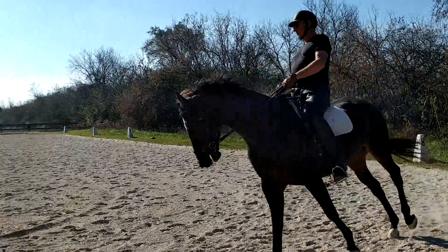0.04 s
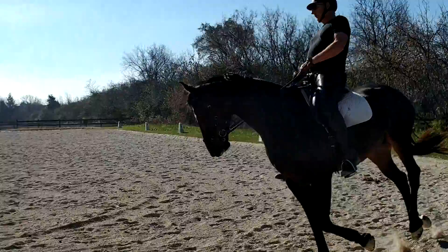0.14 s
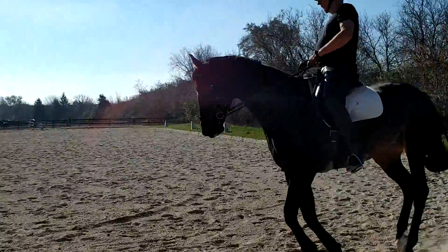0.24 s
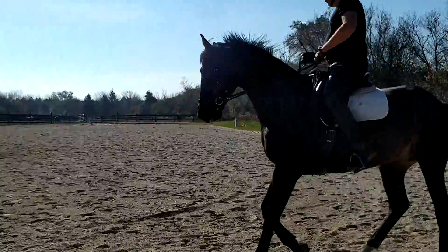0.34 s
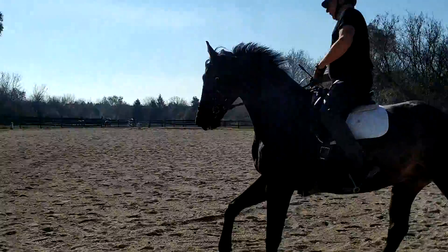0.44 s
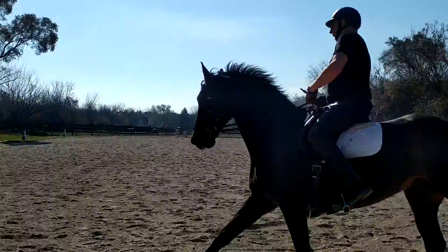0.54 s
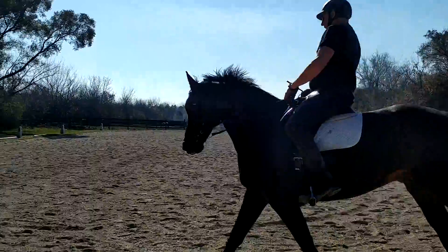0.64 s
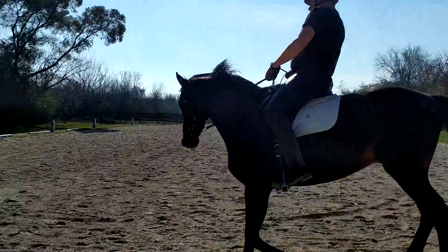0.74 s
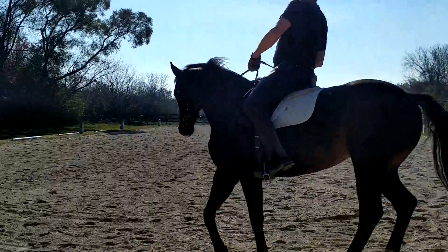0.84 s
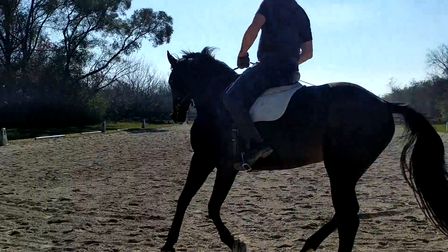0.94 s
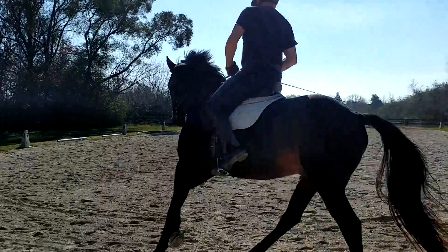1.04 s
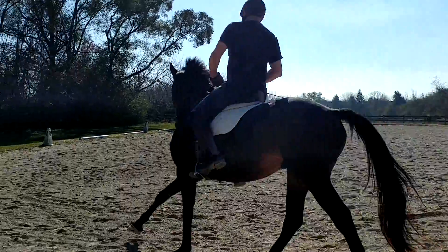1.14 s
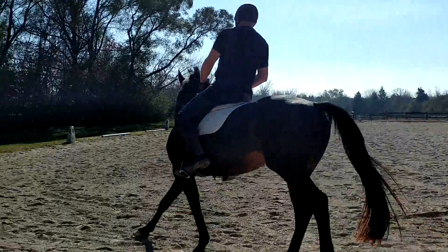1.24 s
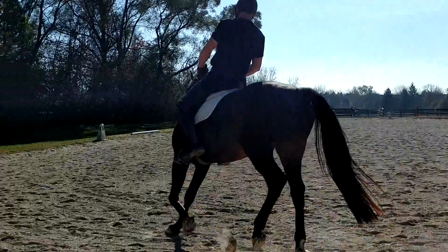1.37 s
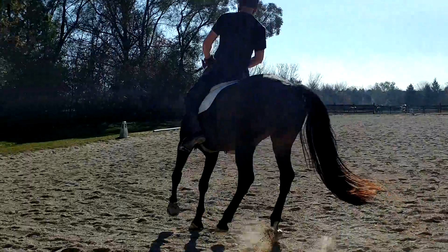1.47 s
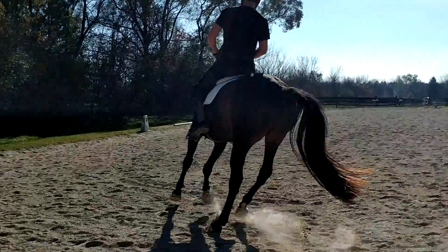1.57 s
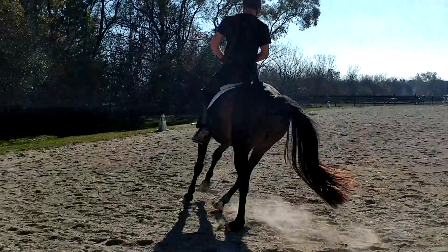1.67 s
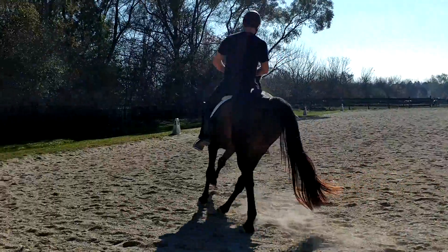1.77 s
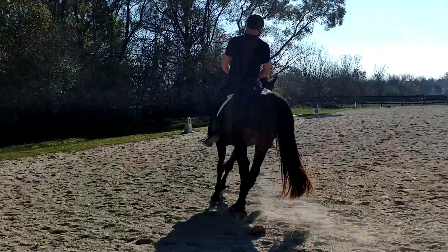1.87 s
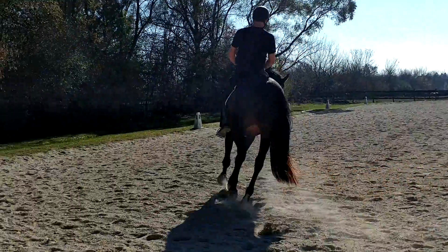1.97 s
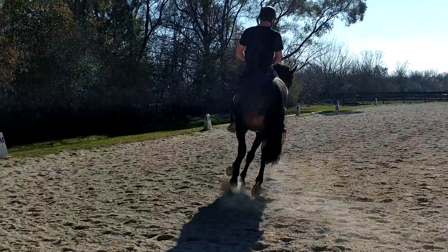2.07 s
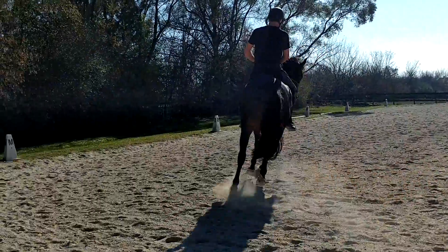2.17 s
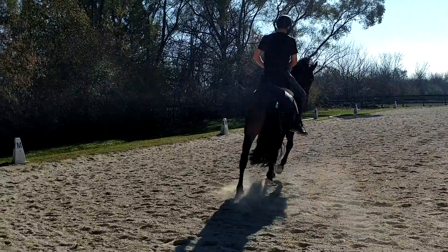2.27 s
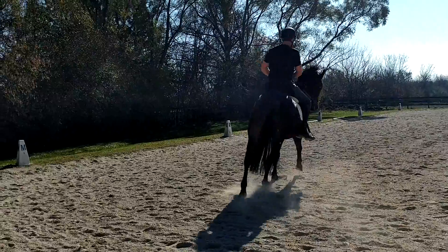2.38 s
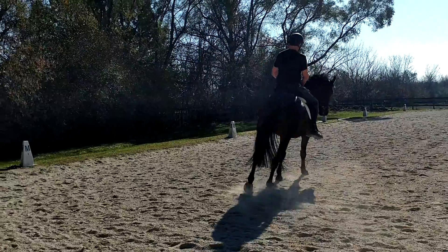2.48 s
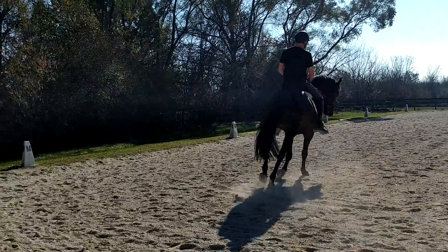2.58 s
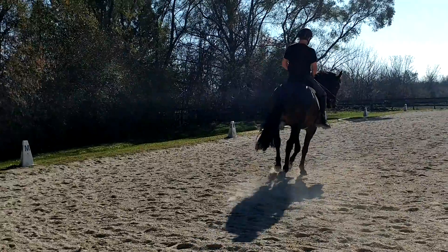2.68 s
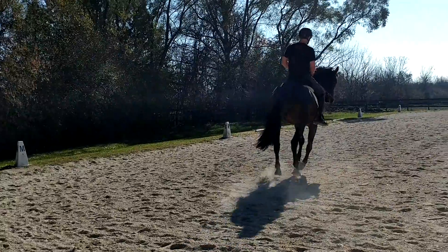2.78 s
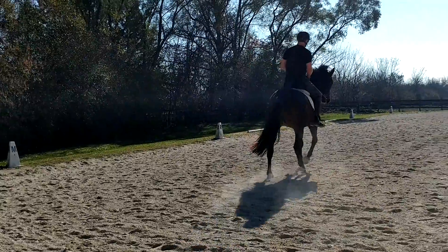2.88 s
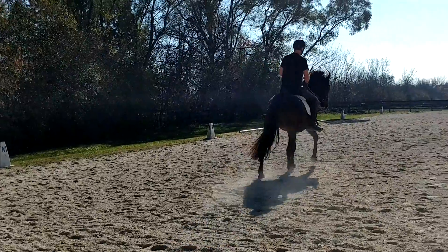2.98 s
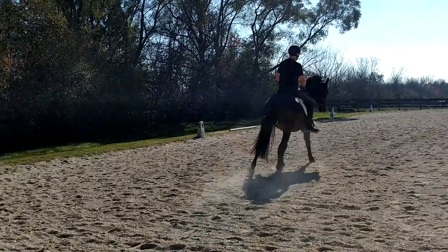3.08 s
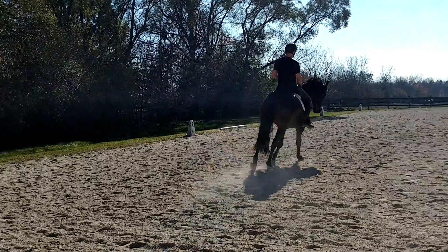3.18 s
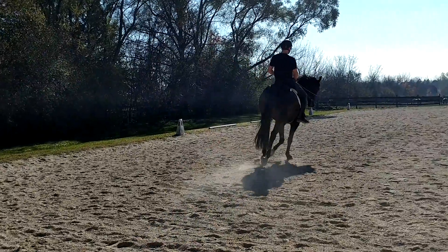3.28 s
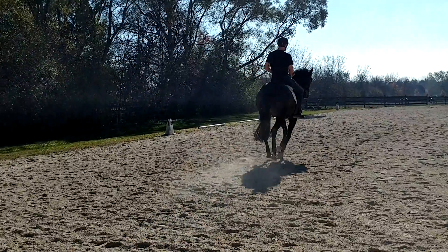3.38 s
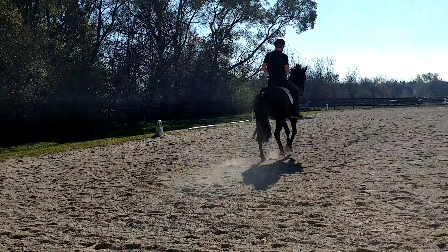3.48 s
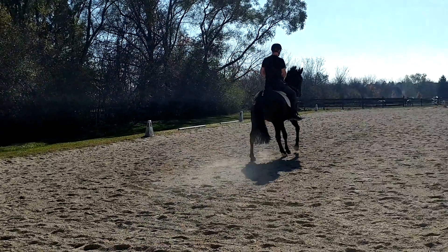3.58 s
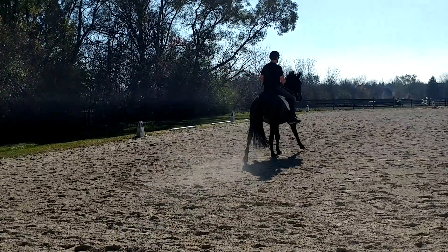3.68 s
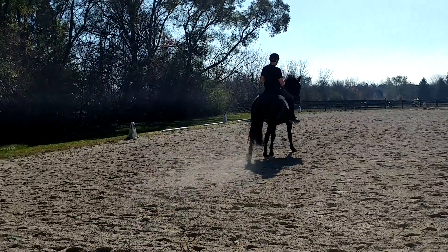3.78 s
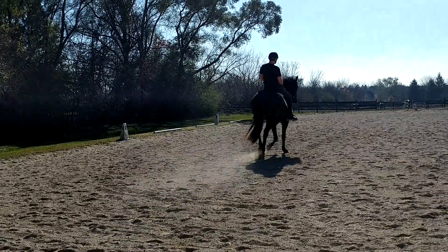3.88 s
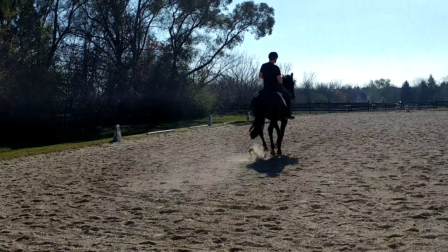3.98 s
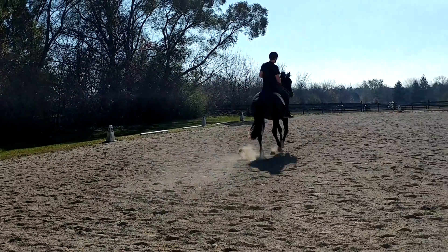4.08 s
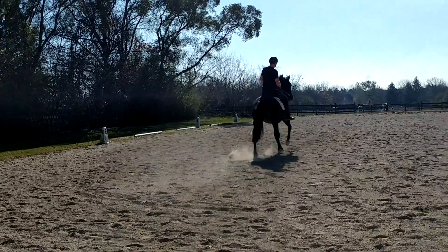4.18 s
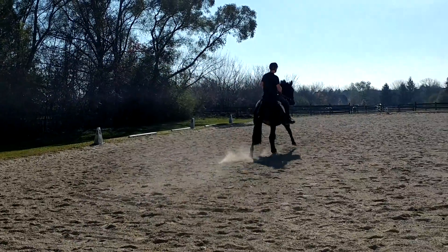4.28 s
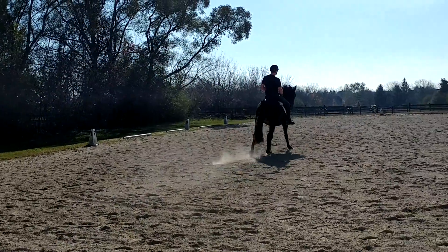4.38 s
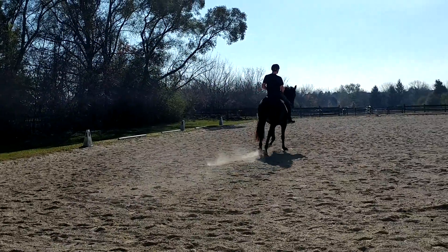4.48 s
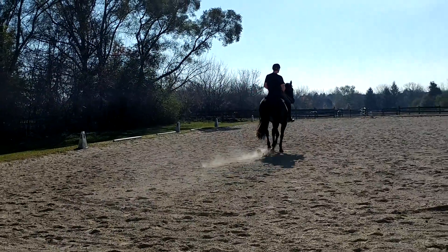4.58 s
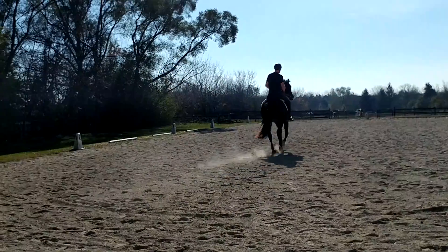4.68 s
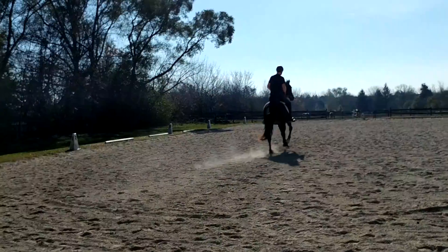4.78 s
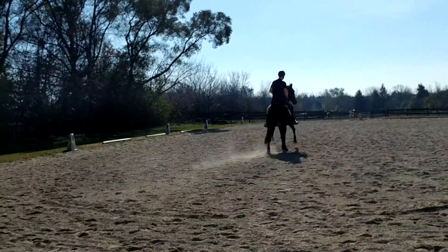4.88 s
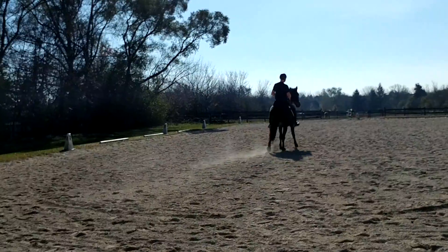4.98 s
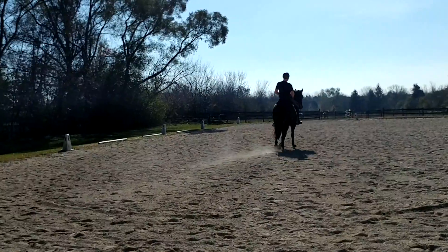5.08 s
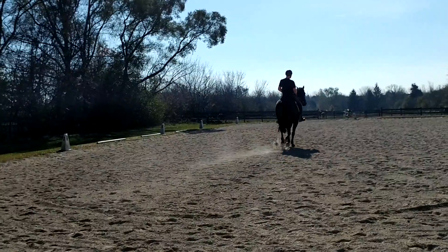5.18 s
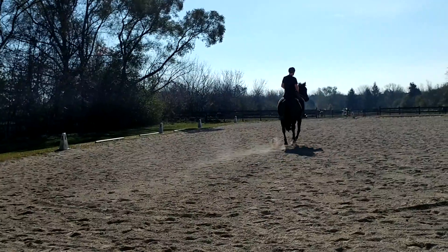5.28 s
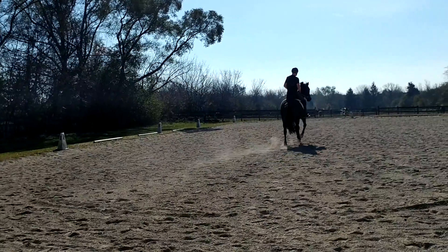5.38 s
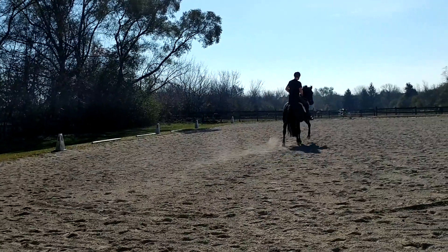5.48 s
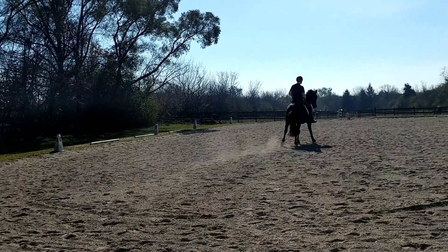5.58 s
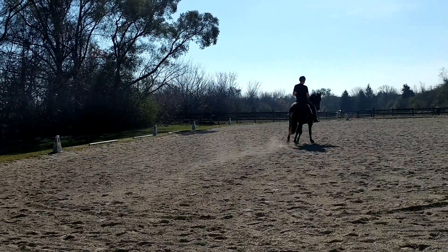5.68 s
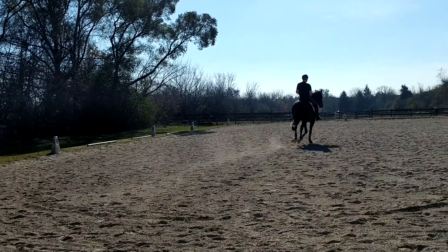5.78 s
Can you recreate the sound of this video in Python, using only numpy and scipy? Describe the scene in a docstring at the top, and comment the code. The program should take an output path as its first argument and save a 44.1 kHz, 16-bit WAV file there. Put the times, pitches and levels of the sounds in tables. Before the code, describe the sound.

Three-beat canter on dry sand passes near, with dull thuds, flung grit, hollow knocks and low honking puffs, growing softer and duller.

```python
"""Canter past on arena sand

In an open arena a horse canters by, 3.5 m from a pair of microphones at its closest, and off to 18 m.
Sagging tones make the thuds; bursts of random grains make the scuffs, flung grit and mid-air clicks.
Disturbed sand trickles, hoof walls knock, and in most strides air honks in the sheath as a fluttering tone.
The steps grow duller with distance; filtered noise lies under it all as faint outdoor air."""
import sys
import numpy as np
from scipy import signal
from scipy.fft import rfft, irfft, next_fast_len
from scipy.io import wavfile

SR = 44100
rng = np.random.default_rng(int(sys.argv[2]) if len(sys.argv) > 2 else 0)


def materialize(psi):
    """Save the field psi as 16-bit PCM at rate SR to the path in sys.argv[1].

    A 1-D psi becomes a single channel; in a 2-D psi each row is a channel.
    """
    bounded = np.clip(np.atleast_2d(psi).T, -1, 1)
    quanta = np.round(bounded * 32767).astype(np.int16)
    wavfile.write(sys.argv[1], SR, quanta)


N = 257103
TIME = np.arange(N) / SR


def gain_of(db):
    """Decibels to amplitude."""
    return 10 ** (np.asarray(db) / 20)


def evened(x):
    """Scales to rms 1."""
    return x / np.sqrt(np.mean(x ** 2) + 1e-20)


def read(points, hz):
    """Reads a curve of (Hz, value) points on a log-frequency axis."""
    f, value = np.transpose(points)
    return np.interp(np.log(hz + 1), np.log(f + 1), value)


def add(mix, s, sound):
    """Lays a sound into the mix at s seconds, cutting whatever falls outside."""
    start = round(s * SR)
    sound = sound[..., max(-start, 0):]
    part = mix[..., max(start, 0):][..., :sound.shape[-1]]
    part += sound[..., :part.shape[-1]]


def wander(rate_hz):
    """Smooth random drift of rms 1, mostly slower than the rate."""
    size = next_fast_len(N)
    hz = np.fft.rfftfreq(size, 1 / SR)
    slow = rfft(rng.standard_normal(size)) / (1 + (hz / rate_hz) ** 4)
    return evened(irfft(slow, size)[:N])


def grains(spectrum, likeness, per_s, spread_db, colour_db=0, count=N):
    """Random clicks of uneven size, shaped by a spectrum and chance resonances, at both microphones; rms 1."""
    size = next_fast_len(count)
    hz = np.fft.rfftfreq(size, 1 / SR)
    signs = rng.choice([-1., 1.], (2, size))
    struck = rng.random((2, size)) < per_s / SR
    sizes_db = spread_db * np.minimum(rng.exponential(1, (2, size)), 4)
    a, b = rfft(signs * struck * gain_of(sizes_db))
    # a shared and an opposed part set how alike left and right are
    same = np.clip(read(likeness, hz), -1, 1)
    mid, side = a * np.sqrt(1 + same), b * np.sqrt(1 - same)
    peaks_hz = np.geomspace(200, SR / 2, 90)
    colour = colour_db * np.interp(hz, peaks_hz, rng.standard_normal(len(peaks_hz)))
    shaped = np.array([mid + side, mid - side]) * gain_of(read(spectrum, hz) + colour)
    return evened(irfft(shaped, size)[:, :count])


# Sand and sheath as the two microphones hear them. Each row: frequency in Hz, left-right likeness from 0 to 1.
LIKENESS = [(30, 1), (300, 0.96), (800, 0.82), (1500, 0.28), (3000, 0.59), (6000, 0.11), (8000, 0.39),
            (16000, 0.045)]


def bursts(times, levels_db, rises, falls, spectrum, **grain):
    """Bursts of grains that each build up to a peak and die away."""
    out, t = np.zeros((2, N)), np.arange(-6000, 10384) / SR
    for s, db, rise, fall in zip(times, levels_db, rises, falls):
        shape = np.exp(np.minimum(t / rise, -t / fall))
        noise = grains(spectrum, LIKENESS, count=len(t), **grain) * shape
        burst = evened(noise) * np.sqrt(np.mean(shape ** 2))
        add(out, s + t[0], gain_of(db) * burst)
    return out


# Murmur and hiss of the open surroundings. Each row: frequency in Hz, relative level in dB per Hz.
AIR = [(25, -19), (55, 7), (110, 4.5), (180, -3), (255, -1), (340, -12.5), (520, 2), (720, -2.5),
       (880, -11), (1100, -15.5), (1800, -24), (5000, -35), (11000, -22), (14000, -52)]
# The same air at the two microphones. Each row: frequency in Hz, left-right likeness from 0 to 1.
AIR_LIKENESS = [(30, 0.97), (200, 0.91), (500, 0.29), (850, 0.0012), (1200, 0), (16000, 0)]
AIR_DB = -69.5  # middle level of the air, which swells around it


def air(swell_db=1):
    """Distant outdoor murmur of wind and faint hiss, slowly swelling."""
    level = gain_of(AIR_DB + swell_db * wander(4.2))
    return level * grains(AIR, AIR_LIKENESS, per_s=30000, spread_db=4)


# Sand sliding and settling on the ground between the steps.
# Each row: time in seconds, slide level and trickle level in dB before the layer trims.
SETTLING = [(0.0, -60.5, -65), (0.8, -52.5, -59), (0.97, -68, -68.5), (1.17, -55.5, -63.5),
            (1.33, -51.5, -63), (1.62, -61.5, -63.5), (2.09, -57, -63.5), (3.07, -73, -74.5),
            (3.73, -74, -80.5), (4.07, -70.5, -79), (4.59, -75.5, -80), (5.83, -78.5, -86)]
# Spectra of moving sand: dull push under the hoof, fine trickle, bright spray of larger grains.
# Each row: frequency in Hz, relative level in dB per Hz.
PUSH = [(150, -15.5), (380, -15), (520, -1), (620, 2.5), (820, -0.5), (1000, -13), (1400, -25.5),
        (3000, -46), (16000, -69)]
TRICKLE = [(500, -10.5), (1300, -5.5), (2400, 0), (6000, -1), (8500, -0.5), (12000, -4), (16000, -12.5)]
SPRAY = [(500, -1), (1200, -21), (2200, -3.5), (3700, 2), (4800, 0.5), (8000, 3.5), (12000, 2.5),
         (16000, -5)]


def settling(slide_db=-3, trickle_db=-2, patchy_db=2, pebbles_db=-7, clump_db=1.5):
    """Disturbed sand slides and trickles on, a few larger grains ticking; it fades as the horse moves off."""
    s, slide, trickle = np.transpose(SETTLING)
    slide_level = gain_of(np.interp(TIME, s, slide) + slide_db)
    trickle_level = gain_of(np.interp(TIME, s, trickle) + trickle_db)
    low = grains(PUSH, LIKENESS, per_s=3000, spread_db=0.5) * slide_level
    fine = grains(TRICKLE, LIKENESS, per_s=7300, spread_db=3.5)
    coarse = gain_of(pebbles_db) * grains(SPRAY, LIKENESS, per_s=350, spread_db=3.5)
    bright = (fine + coarse) * evened(gain_of(clump_db * wander(45)))
    dulled = signal.sosfiltfilt(signal.butter(3, 12000, fs=SR, output="sos"), bright)
    # over the second half the trickle loses its treble above 12 kHz
    dulled_share = np.clip(TIME / TIME[-1] * 2 - 1, 0, 1)
    high = (bright * (1 - dulled_share) + dulled * dulled_share) * trickle_level
    return (low + high) * evened(gain_of(patchy_db * wander(26)))


# Path of the horse past the microphones. Each row: time in seconds, distance in metres.
DISTANCE = [(0, 5.8), (0.8, 3.5), (2.002, 4.8), (3, 11), (5.83, 18)]


def doublings(s):
    """How many doublings the distance at s seconds lies beyond the closest pass."""
    when, metres = np.transpose(DISTANCE)
    return np.log2(np.interp(s, when, metres) / metres.min())


# Canter strides across the sand; the three beats are a hind hoof, the diagonal pair and the leading fore hoof.
# Each row: first landing in seconds, base scuff levels of hind, pair and lead in dB, thud levels of hind
# and pair in dB, reference pitch of the ground in Hz (the thud sags through it), click level in dB before its trim.
STRIDES = [(-0.111, -50, -49.5, -46, -55, -58, 121, -59), (0.516, -44, -40.5, -39.5, -48, -47, 122, -39.5),
           (1.143, -45, -46, -44, -26.5, -44, 107, -40.5),
           (1.777, -48, -53.5, -50.5, -61, -51, 126.4, -35.5), (2.407, -61, -59, -53.5, -66, -61, 121, -47),
           (3.046, -57.5, -58, -59, -47.5, -48, 131.9, -83),
           (3.667, -56.5, -71, -61.5, -50, -68, 132, -56.5),
           (4.293, -65.5, -63, -66.5, -47.5, -55, 97, -61), (4.938, -65, -66, -66.5, -56, -62, 96, -81),
           (5.576, -74, -75, -70, -57.5, -69, 135, -75)]
# the hind hoof settles on its heel with a second, softer thud; then the pair takes the weight
HEEL_S, HEEL_DB, PAIR_THUD_S = 0.037, -13.5, 0.159
# the leading hoof: delay, level on its scuff, gain per doubling of distance
LEAD_THUD_S, LEAD_THUD_DB, LEAD_THUD_GAIN_DB = 0.27, -13, 8


def landings():
    """Hind hoof, heel, diagonal pair and leading hoof load the ground: rows of (s, dB, reference Hz)."""
    rows = []
    for start, _, _, lead_scuff_db, hind_db, pair_db, hz, _ in STRIDES:
        lead_db = lead_scuff_db + LEAD_THUD_DB + LEAD_THUD_GAIN_DB * doublings(start)
        beats = [(0, hind_db), (HEEL_S, hind_db + HEEL_DB), (PAIR_THUD_S, pair_db), (LEAD_THUD_S, lead_db)]
        rows += [(start + delay, db, hz) for delay, db in beats]
    return rows


def thuds(press_s=0.00534, start_sharp=0.99, sag_s=0.0057, rumble_db=-13, rumble_s=0.038):
    """Each landing pushes the ground down; the pitch sags as the hoof sinks in, and the ground shudders."""
    out, t = np.zeros(N), np.arange(SR // 8) / SR
    press = t / press_s * np.exp(1 - t / press_s)
    sag = 0.74 + start_sharp * np.exp(-t / sag_s)
    for s, db, hz in landings():
        turns = np.cumsum(hz * sag) / SR
        add(out, s, gain_of(db) * press * np.sin(2 * np.pi * turns))
    s, db, _ = np.transpose(landings())
    alike = np.ones(len(s))
    # the shudder: (Hz, dB per Hz)
    ground = [(25, -33), (58, 0.5), (110, -7), (220, -8), (600, -52), (3000, -85)]
    rumble = bursts(s + 2 * press_s, db + rumble_db, alike * press_s, alike * rumble_s, ground,
                    per_s=4000, spread_db=7)
    return out + rumble


# Honks from the sheath as the horse passes. Each row: start in seconds, level in dB,
# middle pitch in Hz, length in seconds, rasp against the tone in dB.
HONKS = [(-.025, -35.5, 245, 0.064, -6), (1.199, -29.5, 289, 0.093, 7.5), (1.836, -27, 247.4, 0.11, -0.5),
         (2.462, -44.5, 292, 0.1, 6.5), (3.098, -43.5, 249.7, 0.092, -4), (5.093, -60.5, 255.4, .14, 2)]
# Second to fifth harmonic of the honk. Each entry: level in dB before the rasp.
HONK_OVERTONES = [-23.5, -23, -32.5, -41.5]
# Air rushing with the honk. Each row: frequency in Hz, relative level in dB per Hz.
RUSTLE = [(140, -6), (220, 8), (330, 6.5), (560, -0.5), (800, -11.5), (1100, -21), (1500, -32), (3000, -61)]


def honks(rise_s=0.018, beat=0.123, beat_share=0.26, rough=0.62, rustle_db=-14):
    """Air drawn through slack skin: two close modes beat, with rough overtones and a rush of air."""
    out = np.zeros(N)
    drift, wobble = wander(77), wander(120)
    rush = grains(RUSTLE, LIKENESS, per_s=8000, spread_db=2)[0]
    for s, db, hz, length, rasp_db in HONKS:
        near = (TIME > s) & (TIME < s + length)
        t = TIME[near] - s
        turns = np.cumsum(hz * (1 + .06 * drift[near])) / SR
        second_mode = np.sin(2 * np.pi * (turns + beat * hz * (t - rise_s)))
        tone = np.sin(2 * np.pi * turns) + beat_share * second_mode
        overtones = np.zeros(len(t))
        for k, part_db in enumerate(HONK_OVERTONES, 2):
            phase = 2 * np.pi * k * turns + rough * (k - 1) * wobble[near]
            overtones += gain_of(part_db) * np.sin(phase)
        rasp = gain_of(rasp_db) * (overtones + gain_of(rustle_db) * rush[near])
        swell = np.sin(np.minimum(t / rise_s, 1) * np.pi / 2) ** 2
        shape = swell * (1 - t / length)  # the pressure runs out
        out[near] += gain_of(db) * shape * (tone + rasp)
    return out


# Hooves pushing through the sand in every stride: the hind hoof; the pair's hind hoof, then its fore hoof;
# the leading hoof landing, then pushing off.
# Each row: delay from the first landing to the peak in seconds, level on its beat in dB, rise and fall of
# the scuff in seconds, coarse grit, weight on the hoof and flung sand in dB at the closest pass before
# the layer trims, name of the beat.
GAIT = [(0.004, 0.5, 0.004, 0.02, -7, -1.5, -1.5, "hind"),
        (0.124, -0.5, 0.0082, 0.039, -4, -3.5, -6.5, "pair"), (0.164, -2, 0.013, 0.025, -4, 3, 1.5, "pair"),
        (0.293, 1, 0.013, 0.041, -2, -12, -10, "lead"), (0.388, -9.5, 0.018, 0.074, -9.5, -5, -7.5, "lead")]
GRIT_LOSS_DB, SPRAY_LOSS_DB, WEIGHT_GAIN_DB = 6, 3.5, 2  # per doubling of distance: steps grow duller


def steps():
    """Plays the gait in every stride: rows of (s, dB, rise s, fall s, grit dB, weight dB, flung dB)."""
    rows = []
    for start, hind, pair, lead, *_ in STRIDES:
        beat_db = {"hind": hind, "pair": pair, "lead": lead}
        for delay, db, rise, fall, grit, weight, flung, beat in GAIT:
            s = start + delay
            far = doublings(s)
            if 0 < s < TIME[-1]:
                rows.append((s, beat_db[beat] + db, rise, fall, grit - GRIT_LOSS_DB * far,
                             weight + WEIGHT_GAIN_DB * far, flung - SPRAY_LOSS_DB * far))
    return rows


# Further scuffs in the sand: hooves landing a little off the even pattern, and toes dragging.
# Each row: peak in seconds, level in dB, rise in seconds, fall in seconds, coarse grit in dB before the layer trim.
EXTRA_SCUFFS = [(0.122, -46, 0.0059, 0.026, -16), (0.362, -45.5, 0.038, 0.029, -12.5),
                (0.459, -47.5, 0.0036, 0.04, -15), (0.77, -43.5, 0.0027, 0.025, -10),
                (1.265, -43.5, 0.0029, 0.014, -5), (1.712, -46.5, 0.0048, 0.011, -1.5),
                (1.745, -45, 0.003, 0.0081, -12.5), (4.02, -62, 0.0023, 0.065, -14.5),
                (4.428, -61, 0.003, 0.02, -13), (4.586, -62.5, 0.0046, 0.024, -27),
                (5.322, -66, 0.009, 0.039, -20)]
EXTRA_WEIGHT_DB = -11  # body of a further scuff, before the layer trim
# Coarse grit crunching, and the low body under load. Each row: frequency in Hz, relative level in dB per Hz.
GRIT = [(500, -24), (900, -5), (1150, -1), (1380, 1), (1750, -6), (2200, -11), (2700, -18), (5000, -24),
        (16000, -42)]
WEIGHT = [(25, -58), (55, 1), (120, -3.5), (200, -2), (330, -3.5), (450, -6.5), (700, -15), (3000, -85)]


def scuffs(grit_db=-1, weight_db=-1, clump_db=2.5):
    """Sand gives way in clumps: a dull push, a crunch of coarse grains and a low body under load."""
    gait_rows = [row[:-1] for row in steps()]
    extra_rows = [(*row, EXTRA_WEIGHT_DB) for row in EXTRA_SCUFFS]
    s, db, rise, fall, grit, weight = np.transpose(gait_rows + extra_rows)
    push = bursts(s, db, rise, fall, PUSH, per_s=3000, spread_db=2, colour_db=2.0)
    crunch = bursts(s, db + grit + grit_db, rise, fall, GRIT, per_s=2200, spread_db=3, colour_db=2.2)
    body = bursts(s, db + weight + weight_db, rise, fall, WEIGHT, per_s=2700, spread_db=2)
    return (push + crunch) * evened(gain_of(clump_db * wander(97))) + body


# Kicked handfuls of sand striking hoof and leg.
# Each row: peak in seconds, level in dB before the layer trim, fall in seconds.
SPRAYS = [(0.035, -53, 0.03), (0.181, -42, 0.016), (0.404, -47.5, 0.007), (0.793, -38, 0.013),
          (1.083, -49.5, 0.004), (1.143, -46, 0.008), (1.311, -47, 0.0093), (1.535, -49.5, 0.0047),
          (1.702, -37, 0.02), (2.024, -51.5, 0.007), (2.083, -49.5, 0.009), (2.112, -36.5, 0.015),
          (2.296, -49.5, 0.022), (2.676, -54, 0.035), (2.744, -56, 0.015), (2.923, -50.5, 0.012),
          (2.989, -48.5, 0.0091), (3.025, -61.5, 0.035), (3.204, -58, 0.015), (3.392, -57.5, 0.029),
          (3.584, -61, 0.008), (4.02, -48.5, 0.031), (4.649, -62, 0.03)]
SPRAY_RISE_SHARE = 0.14  # rise time over fall time
FLUNG_QUICKNESS = 0.71  # flung sand comes and goes in this share of its scuff's times
# tack or a shoe clicks in mid-air, this long after the first landing
CLICK_S, CLICK_RISE_S, CLICK_FALL_S = 0.485, 0.00055, 0.0094


def sprays(level_db=-3.5, click_db=-4.0, shower_db=-3.5):
    """Steps fling hissing showers of fine sand; kicked handfuls and each stride's click crackle brightly."""
    s, db, rise, fall, _, _, flung = np.transpose(steps())
    shower = bursts(s, db + flung + shower_db, rise * FLUNG_QUICKNESS, fall * FLUNG_QUICKNESS, TRICKLE,
                    per_s=4000, spread_db=3.5, colour_db=3.0)
    kicks = [(s, db + level_db, SPRAY_RISE_SHARE * fall, fall) for s, db, fall in SPRAYS]
    clicks = [(start + CLICK_S, db + click_db, CLICK_RISE_S, CLICK_FALL_S) for start, *_, db in STRIDES]
    crackle = bursts(*np.transpose(kicks + clicks), SPRAY, per_s=5000, spread_db=5, colour_db=4)
    return shower + crackle


# Knocks on the hoof wall, from hollow taps to the tick of a pebble.
# Each row: start in seconds, level in dB, pitch in Hz, time from start to loudest in seconds.
KNOCKS = [(0.7949, -24.5, 790, 0.0009), (0.8001, -27, 1310, 0.0011), (.824, -43, 1386, 0.0087),
          (.8925, -28.5, 769, 0.0052), (1.518, -39.5, 800, 0.0036), (2.078, -44, 980, 0.0024),
          (2.1123, -30, 6960, 0.00017), (2.685, -41, 890, 0.00068), (3.051, -46, 590, 0.0014),
          (3.162, -49, 616, 0.0014), (3.669, -49.5, 600, 0.0015), (4.427, -53, 620, 0.0015)]


def knocks():
    """The cup of a hoof rings briefly, swelling and dying at one pitch."""
    out, t = np.zeros(N), np.arange(SR // 16) / SR
    for s, db, hz, ring in KNOCKS:
        shape = (t / ring * np.exp(1 - t / ring)) ** 2
        add(out, s, gain_of(db) * shape * np.sin(2 * np.pi * hz * t))
    return out


def scene():
    """Open ground: everything arrives dry, with knocks, honks and the thuds' tones alike on both sides."""
    return air() + settling() + thuds() + honks() + scuffs() + sprays() + knocks()


# Cavities of the left and the right microphone. Each row: ring in Hz, its width in Hz,
# boost of the ring in dB, change of the top octave in dB.
PORTS = [(10300, 720, 14, 1), (7500, 1700, 8.5, -5)]
EDGE_HZ = 15850  # upper band limit


def record(dry, bass_cut_hz=32):
    """Each port rings at its own treble pitch, a dead spot between; deepest bass and top treble are lost."""
    coloured = []
    for x, (hz, width, db, top_db) in zip(dry, PORTS):
        ring = signal.lfilter(*signal.iirpeak(hz, hz / width, SR), x)
        top = signal.filtfilt(*signal.butter(2, 9500, "highpass", fs=SR), x)
        coloured.append(x + (gain_of(db) - 1) * ring + (gain_of(top_db) - 1) * top)
    dead_spot = signal.lfilter(*signal.iirpeak(9130, 6.5, SR), coloured)
    coloured = coloured - .8 * dead_spot
    thinned = signal.sosfilt(signal.butter(2, bass_cut_hz, "highpass", fs=SR, output="sos"), coloured)
    edge = signal.firwin(511, EDGE_HZ, window=("kaiser", 9), fs=SR)
    return signal.oaconvolve(thinned, edge[None], "same", axes=1)


dry = scene()
out = record(dry)
materialize(out)
```